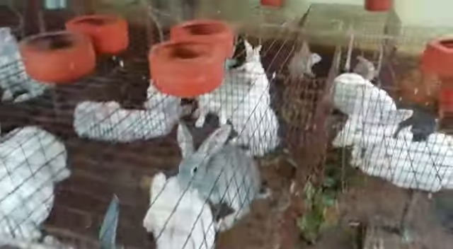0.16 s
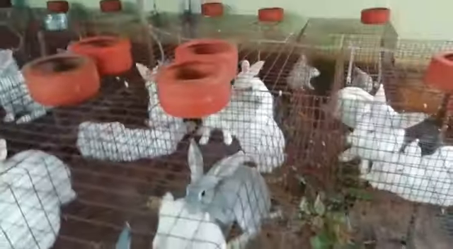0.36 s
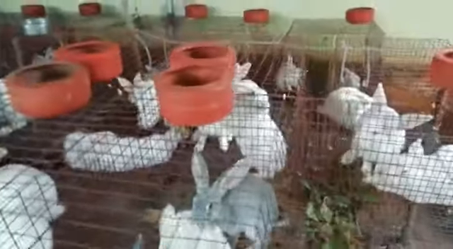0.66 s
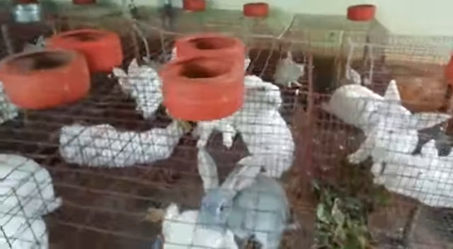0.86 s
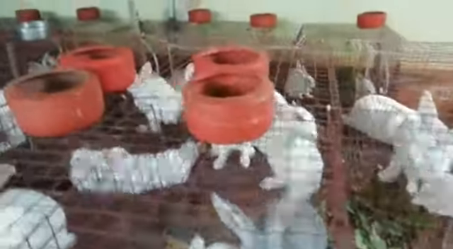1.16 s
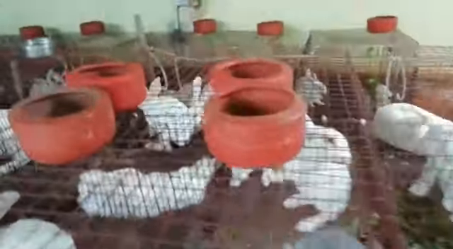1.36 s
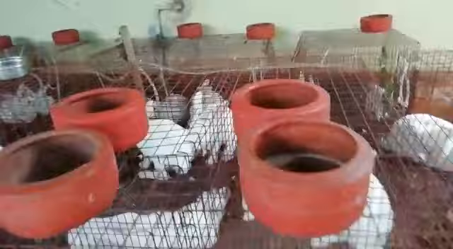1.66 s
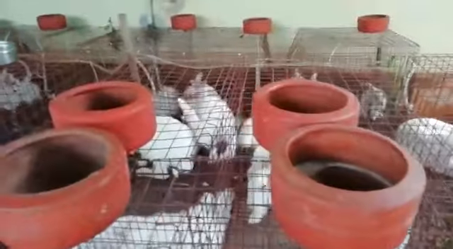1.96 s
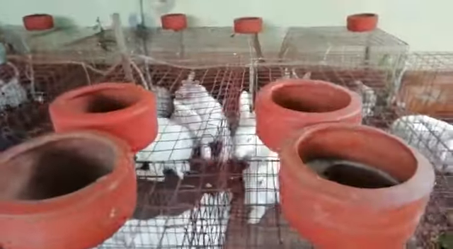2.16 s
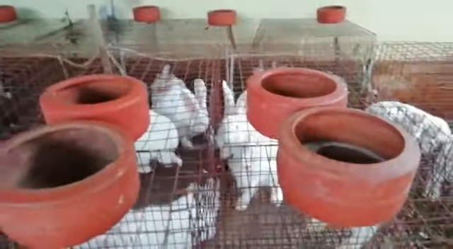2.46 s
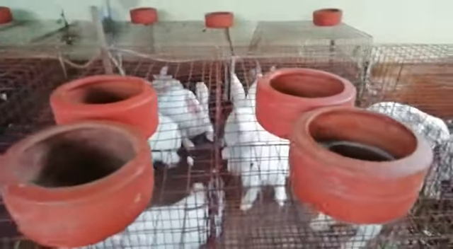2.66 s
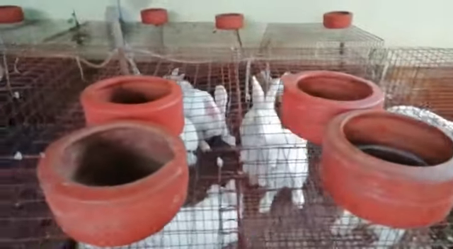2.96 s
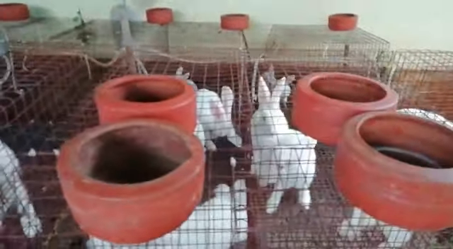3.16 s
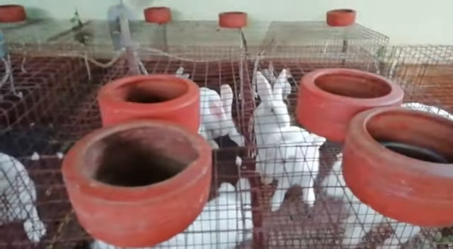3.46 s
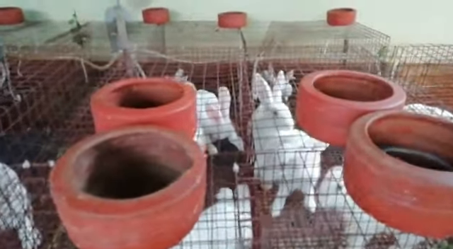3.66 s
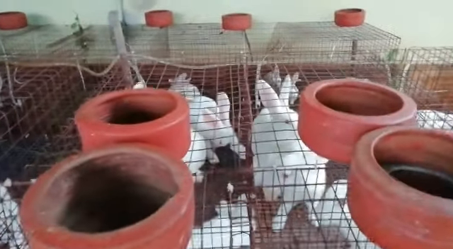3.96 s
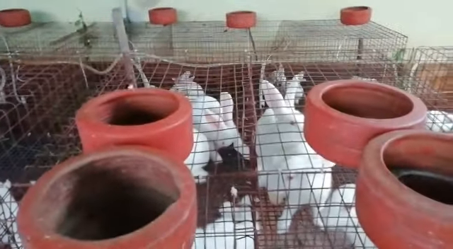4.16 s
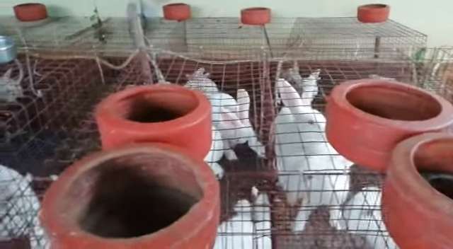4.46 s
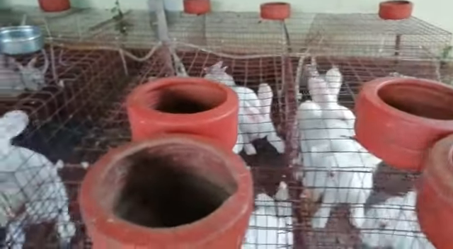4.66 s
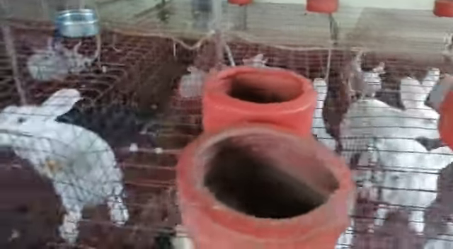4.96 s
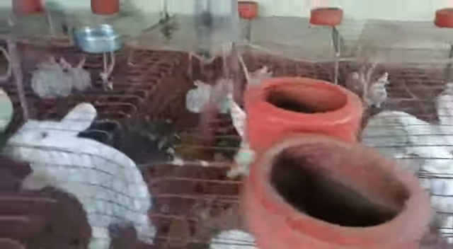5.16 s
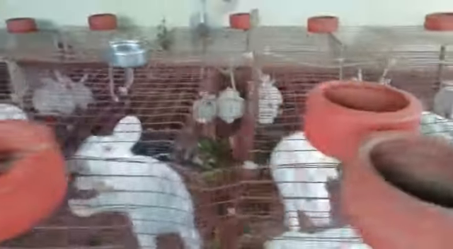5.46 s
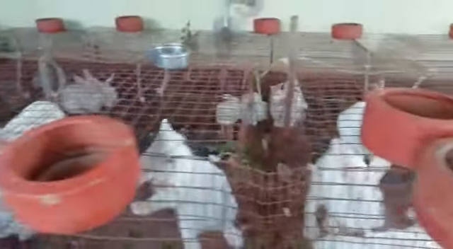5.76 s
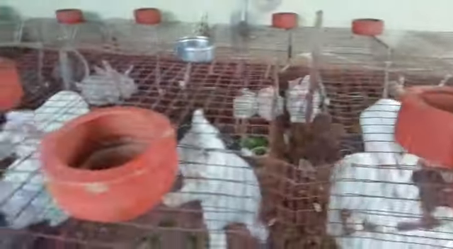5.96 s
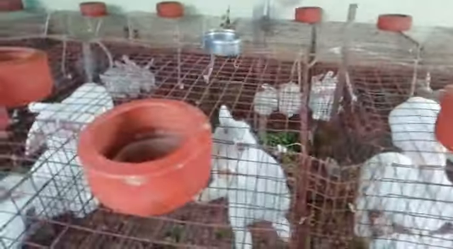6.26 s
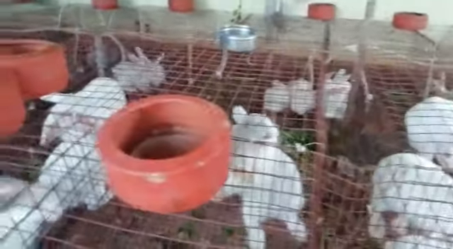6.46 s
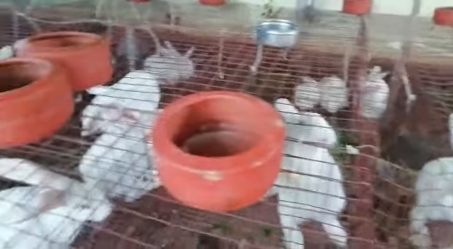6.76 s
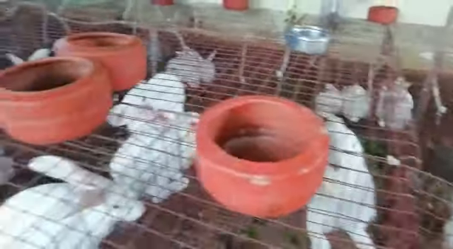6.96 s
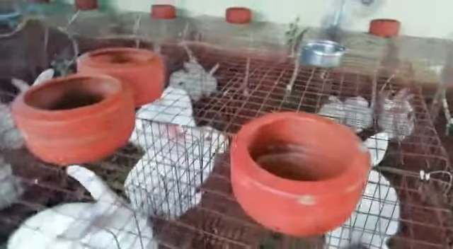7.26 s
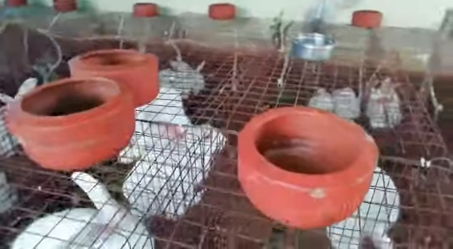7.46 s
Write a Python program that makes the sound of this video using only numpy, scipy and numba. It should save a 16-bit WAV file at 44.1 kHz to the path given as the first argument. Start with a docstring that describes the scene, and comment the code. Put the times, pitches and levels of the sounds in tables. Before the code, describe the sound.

Rabbits move about on wire-mesh cage floors in a shed, heard close on a hand-held phone. A soft, gritty patter runs throughout, broken by irregular hops, scuffles, thin claw ticks and brief wire jangles. During the first second a finger rubs and creaks on the microphone, mostly on the right, with a sharp creak near 0.4 seconds and a scrape near 0.8, then slides off and the sound opens up. Stronger scuffles come around 1.6 to 1.8 seconds, starting with a short clay bowl knock. The bowl is knocked again at about 3.2 and 3.9 seconds, followed by a strong scuffle at 4. Lighter shuffling and ticking continue, with more hops near 6, 6.8, 7.1 and 7.5 seconds. A faint distant motor hum and steady low rumble sit underneath, and the knocks and ticks have only a very short echo.

```python
"""A shed: rabbits shuffle, hop and scratch on wire-mesh cage floors, heard by a two-port hand-held phone.
Paws rustle the mesh, claws tick on wires, a clay bowl is knocked; a far motor hums over low rumble.
For the first second a finger half covers the right port, creaking and rubbing on the case,
then slides off."""
import sys
import numpy as np
from scipy import signal
from scipy.fft import rfft, irfft
from scipy.io import wavfile
from numba import njit

SR = 44100
rng = np.random.default_rng(int(sys.argv[2]) if len(sys.argv) > 2 else 0)


def bounce(signal):
    """Save signal as a 16-bit WAV file at the path given by the first command-line argument."""
    frames = np.transpose(np.atleast_2d(signal))
    limited = np.clip(frames, -1, 1)
    pcm = np.round(limited * 32767).astype(np.int16)
    wavfile.write(sys.argv[1], SR, pcm)


N = 336042
TIME = np.arange(N) / SR

# Clear hops and scuffles: start_s, level_db, t60_s, heft_db, bright_db, pan_db (left minus right)
SCUFFLES = [(.048, -39.5, 0.16, 3, -6, 5), (.372, -53, .22, 3, 10.5, 9), (.414, -53, 0.19, -1, 7, 7),
            (.639, -50.5, 0.17, -2, 3, 19), (.783, -47.5, .21, 9.5, 3, 6), (1.152, -57, 0.21, -10, 17, 2),
            (1.339, -43, 0.69, 1.5, 0.5, 0.5), (1.485, -48, 0.14, -14, 8, 3),
            (1.531, -39.5, 0.22, -12, 2, -2), (1.591, -27, .21, -5.5, -1.5, 4),
            (1.675, -48, .22, -12, 8, -8), (1.741, -36, 0.53, -1, -3, -.5),
            (1.81, -25.5, 0.19, -4.5, -3, 3), (2.079, -43.5, 0.27, 6.5, 4, -1),
            (2.358, -48.5, 0.15, 10, -9, 0), (2.5, -38.5, 0.32, -4, -8, -1.5),
            (2.685, -36, 0.38, 2, 0, 1.5), (2.904, -44.5, 0.19, 2, 1, -4), (2.925, -44.5, 0.19, -17, 6, -9),
            (2.972, -48.5, 0.18, -10, 6, -2), (3.172, -42, .15, 2, -6, -2),
            (3.229, -29.5, 0.31, -7.5, -0.5, 5), (3.396, -54.5, 0.51, -12, 15.5, 0),
            (3.599, -47.5, .4, -6, 5.5, 3), (3.689, -49, 0.64, -5, 2.5, -7),
            (3.855, -28.5, 0.16, -19, -7.5, 5), (4.045, -23.5, 0.28, -3.5, -8.5, -1),
            (4.206, -38, 0.31, 2, -7, -1.5), (4.353, -42.5, .46, -0.5, 2, 0),
            (4.64, -39.5, 0.33, -16, -15, 1), (4.67, -41, .24, -22, -4.5, -4),
            (4.785, -44, 0.55, -1, -2, -3), (5, -39.5, .11, 5.5, -4, 0.5), (5.123, -46.5, .15, 1, 1.5, -4),
            (5.427, -48.5, 0.36, 3.5, -1, -5), (5.522, -45.5, .12, 4, -11, -1),
            (5.609, -38, .2, -3.5, -4.5, -3.5), (5.689, -35.5, 0.26, -8, -15, -2.5),
            (5.716, -46, 0.17, 0, -8, -2), (5.824, -49, 0.29, 4, 6.5, -3), (5.844, -37, .31, -3, -2.5, 2.5),
            (5.954, -31.5, 0.33, 1, -1, -1.5), (6.242, -37.5, 0.41, -7, -8.5, -5),
            (6.435, -44.5, .28, 3, -12, 0), (6.382, -53, 0.43, -8, 4, -3), (6.529, -47, 0.23, -4, 1.5, -8),
            (6.572, -46, 0.71, 5, 1, -2), (6.669, -51.5, 0.13, -14, 10, -9),
            (6.761, -36, 0.52, -0.5, 2, -1), (6.898, -38.5, 0.27, 2.5, -2, -2),
            (7.048, -41.5, 0.31, 2, -2, -1.5), (6.986, -50, 0.14, -1, -6, -9), (7.14, -35, 0.3, -5, -5, -1),
            (7.331, -45.5, .18, -7, 4.5, -9), (7.53, -30.5, .29, -4.5, -19, -3),
            (7.563, -33, 0.23, -20, -12, 0)]
# Resonances of the stiffer wires: pitch_hz, width_hz, gain_db
WIRE_MODES = [(1160, 340, -18.5), (1533, 52, -8.5), (2030, 65, -12), (2520, 130, -10.5), (2790, 690, -14),
              (3635, 25, -3)]


def mesh_rustle():
    """Near paws and the far herd shake the mesh: gritty noise in five bands, through wire resonances."""
    # Animals further off: time_s, patter_db, sizzle_db
    herd = [(0.0, -49.5, 2.5), (0.74, -53, 4.5), (0.89, -48.5, 0), (1.31, -49.5, 2), (1.7, -49.5, 8.5),
            (1.89, -49.5, 3), (4.11, -48, 2), (5.14, -50, 1.5), (6.35, -49.5, 0.5), (6.66, -49.5, 3.5),
            (7.62, -48.5, 1.5)]
    herd_s, patter_db, sizzle_db = np.transpose(herd)
    # lo_hz, hi_hz, rise_factor, gain_db, heft_share, bright_share
    bands = [(57.5, 664, 2.3, 2.6, 1.14, 0),  # thump
             (620, 2950, 1.2, .21, 1.03, 0),  # body
             (1710, 4030, 1.63, -.22, 0, 0),  # rattle
             (4160, 8560, .2, 1.14, 0, .9),  # sizzle
             (8340, 13800, .25, .44, 0, .88)]  # air
    base_rise_s, snap_s = .0042, .0027
    out, t = np.zeros((2, N)), TIME[:SR // 4]
    paws = SCUFFLES + faint_scuffles()
    for lo_hz, hi_hz, rise_factor, gain_db, heft_share, bright_share in bands:
        treble = lo_hz > 4000
        far = undb(np.interp(TIME, herd_s, patter_db + treble * sizzle_db))
        far *= grit(per_s=650, spread_db=3, smear_s=.01)
        far *= grit(per_s=30, spread_db=1.5, smear_s=.056) ** .44  # bouts of scratching
        attack = 1 - np.exp(-(t / (rise_factor * base_rise_s)) ** 2)
        snap = 1 + treble * .69 * np.exp(-t / snap_s)  # wires snap at first touch
        near = np.zeros((2, N))
        for start_s, level_db, t60_s, heft_db, bright_db, pan_db in paws:
            band_db = level_db + gain_db + heft_share * heft_db + bright_share * bright_db
            add(near, start_s, attack * snap * pan(pan_db) * undb(band_db - 60 * t / t60_s))
        near *= grit(per_s=2400, spread_db=2, smear_s=.0034)
        out += band(port_noise(N), lo_hz, hi_hz) * np.hypot(far, near)
    return out + sum(undb(gain_db) * signal.lfilter(*signal.iirpeak(hz, hz / width_hz, SR), out)
                     for hz, width_hz, gain_db in WIRE_MODES)


def faint_scuffles(per_s=2.8, level_db=-59, t60_s=.1, spread_db=6):
    """Light paw falls at random times, as rows like SCUFFLES."""
    count = int(per_s * N / SR)
    starts_s = rng.random(count) * N / SR
    offsets_db = rng.standard_normal((count, 4)) * spread_db
    return [(start_s, level_db + size_db / 2, t60_s, heft_db, bright_db, pan_db)
            for start_s, (size_db, heft_db, bright_db, pan_db) in zip(starts_s, offsets_db)]


def claw_ticks(patter_per_s=160):
    """Claws and teeth tick on single wires, over a faint random patter from all around."""
    # Clear ticks: start_s, level_db, pitch_hz, cycles, pan_db
    ticks = [(1.0743, -33, 5710, 4, 8.5), (1.154, -17.5, 9560, 6.8, -10), (1.4862, -24.5, 6940, 1.9, -14),
             (1.4902, -27, 5770, 1.2, 0), (1.5322, -32, 5560, 5, -4), (1.6765, -29.5, 4100, 6.9, -8),
             (1.681, -27, 6700, 6.3, 0), (1.7423, -30.5, 6520, 3.4, -3), (1.8119, -30, 6500, 6, -3),
             (2.2656, -15.5, 8200, 2.9, -6), (2.3791, -35, 1390, 1.2, 0), (2.6876, -29, 2600, 1.7, -5),
             (2.745, -29.5, 6260, 4.2, 0), (2.7906, -34.5, 1940, 1.8, -4), (2.9749, -34, 6850, 7.5, -2),
             (3.1278, -33.5, 6630, 5, -3), (3.1738, -35, 2030, 1.6, -3), (3.544, -43.5, 825, 4, -4),
             (3.599, -39.5, 810, 5.8, -4), (3.8399, -29.5, 6400, 10, 3), (4.0458, -28, 6160, 7.4, -3),
             (4.052, -27, 2350, 3.1, -3), (4.208, -26, 6540, 3.8, -5), (4.3534, -42.5, 1180, 2.7, -3),
             (4.6399, -32, 2040, 1.4, 0), (5.269, -43.5, 2370, 4.5, -10), (5.371, -44, 2230, 4.7, -9),
             (5.4284, -36, 1990, 1, 0), (5.6882, -30, 4200, 2.6, -10), (5.9539, -24, 7000, 4.6, -9),
             (6.4347, -33, 2220, 1, -6), (6.4955, -35, 1990, 1.4, -4), (6.5735, -29.5, 1920, 2, -1),
             (6.599, -33, 1750, 1.7, 0), (6.62, -36, 1850, 2, -7), (6.7602, -30, 6680, 5.2, -2),
             (6.8186, -27, 6900, 6.2, -1), (7.2638, -32.5, 2280, 2.8, -4), (7.5278, -26.5, 2260, 1.2, -3)]
    out = np.zeros((2, N))
    for start_s, level_db, pitch_hz, cycles, pan_db in ticks:
        add(out, start_s, undb(level_db) * pan(pan_db) * click(pitch_hz, cycles))
    for when, thinness, length, size, place in rng.random((int(patter_per_s * N / SR), 5)):
        level_db = -58 + 9 * (size ** 3 + 1.4 * thinness)  # thin wires tick sharper
        tick = click(pitch_hz=900 * 11 ** thinness, cycles=1.04 + 3 * length ** 2)
        add(out, when * N / SR, undb(level_db) * pan(16 * (place - .5)) * tick)
    return out


def bowl_knocks(spread_db=3, detune=.012):
    """A clay bowl is bumped and rebounds; each blow lands elsewhere, so its modes vary."""
    # Blows: start_s, level_db
    knocks = [(1.594, -19.5), (1.6051, -23), (2.688, -34.5), (3.23, -36), (3.2389, -25), (3.8563, -20.5),
              (3.8626, -19.5), (3.8656, -40), (3.9032, -40)]
    # Bowl modes: pitch_hz, gain_db, t60_s
    modes = [(1216, -12.5, 0.036), (1250, -14.5, 0.04), (1404, -10.5, 0.039), (1422, -7.5, 0.043),
             (1478, -21, 0.12)]
    out = np.zeros(N)
    for start_s, level_db in knocks:
        for pitch_hz, gain_db, t60_s in modes:
            size, offset = rng.standard_normal(2)
            tone = ring(pitch_hz * (1 + detune * offset), t60_s)
            add(out, start_s, undb(level_db + gain_db + spread_db * size) * tone)
    return out


def wire_rings(t60_s=.071, jangle_s=.07, detune=.117):
    """Single wires ring on after a paw; each clear scuffle also jangles a few, off pitch."""
    # Ringing wires: start_s, level_db, pitch_hz
    rings = [(1.622, -43, 2610), (1.638, -42, 2500), (2.721, -49, 2670), (2.86, -51, 2500),
             (3.02, -50, 2750), (3.245, -44, 2750), (3.09, -49, 1510), (3.886, -44, 2776),
             (4.06, -37, 2710), (4.216, -42, 2410), (5.267, -49, 2640), (5.855, -41.5, 3095),
             (5.97, -42, 1074), (6.317, -44, 2600), (6.781, -50, 2570), (6.915, -45, 2620),
             (7.06, -47, 842)]
    out = np.zeros((2, N))
    for start_s, level_db, pitch_hz in rings:
        add(out, start_s, undb(level_db) * ring(pitch_hz, t60_s))
    for start_s, scuffle_db, *_, pan_db in SCUFFLES:
        for pitch_hz, _, _ in WIRE_MODES:
            late, offset, weakness = rng.random(3)
            level_db = scuffle_db - 18 - 12 * late - 14 * weakness
            tone = ring(pitch_hz * (1 + detune * (2 * offset - 1)), t60_s)
            add(out, min(start_s + jangle_s * late, TIME[-1]), undb(level_db) * pan(pan_db) * tone)
    return out


def finger(port_hz):
    """Skin rubs and creaks at the right port; it reaches the left later and duller, round the case."""
    # Creaks on the case: start_s, level_db, pitch_hz, cycles
    creaks = [(0.049, -24.5, 1490, 0.72), (0.339, -24.5, 480, 1.85), (0.384, -32, 403, 1.8),
              (.425, -34, 1500, 1.7), (0.436, -31, 300, 0.94), (0.441, -3.5, 2620, 1.54),
              (0.442, -12.5, 2000, 1.5), (0.448, -10.5, 1730, 1.34), (.4516, -31, 204, .9),
              (.452, -8, 1290, 0.55), (0.4546, -21, 1820, 1.8), (0.745, -25.5, 1390, 4.87),
              (.8185, -22, 1800, 3.4), (.8197, -12.5, 3650, 1.9), (.8203, -33, 8000, 0.83),
              (.891, -24, 1500, 2.1), (0.962, -19.5, 1190, 0.45)]
    slide = undb(stroke_level_db()) * grit(per_s=14000, spread_db=6, smear_s=.0025)
    skin = unit_rms(band(rng.standard_normal(N), 290, 6000))
    rub = cavity(cavity(skin, port_hz, damping=.63), .94 * port_hz, damping=2.2)
    hiss = band(band(rng.standard_normal(N), 4900, 14000), 3000, 15000)
    whistle = cavity(hiss, port_hz, damping=.24)
    openness = (port_hz / port_hz.max()) ** 5
    right = slide * (rub + openness * (undb(-4.5) * hiss + undb(-10) * whistle))
    for start_s, level_db, pitch_hz, cycles in creaks:
        add(right, max(start_s - .001, 0), undb(level_db) * click(pitch_hz, cycles))
    left = signal.sosfilt(signal.butter(1, 330, fs=SR, output="sos"), np.roll(right, 24))
    return np.array([left, right])


def stroke_level_db(rest_db=-60, lift_s=1):
    """Finger strokes rise, hold, let go and drag; the resting finger whispers until it lifts."""
    # Strokes on the case: peak_s, level_db, rise_s, hold_s
    strokes = [(0., -32.5, .01, .001), (0.343, -39, .01, .001), (0.442, -31, .012, .001),
               (0.756, -37, 0.04, .002), (0.842, -22, .032, 0.017), (.96, -36, .01, .01),
               (.984, -24.5, 0.015, .02)]
    rise_db, release_db_per_s = 15.5, 597
    drag_db, drag_db_per_s = -7.5, 200
    out = np.where(TIME < lift_s, rest_db, -150.)
    for peak_s, level_db, rise_s, hold_s in strokes:
        before_s = np.maximum(peak_s - TIME, 0)
        after_s = np.maximum(TIME - peak_s - hold_s, 0)
        fall_db = np.maximum(-release_db_per_s * after_s, drag_db - drag_db_per_s * after_s)
        out = np.maximum(out, level_db + fall_db - rise_db * before_s / rise_s)
    return out


def port_pitch_hz(covered_hz=3070, open_hz=7230, open_s=1, slide_s=.0182):
    """The right port's resonance rises briefly as the finger shifts, then jumps as it slides off."""
    shift_hz, shift_s, shift_width_s = 500, .85, .031
    shift = np.exp(-((TIME - shift_s) / shift_width_s) ** 2)
    opened = (1 + np.tanh((TIME - open_s) / slide_s)) / 2
    return covered_hz + shift_hz * shift + (open_hz - covered_hz) * opened


def shed_echo(x, t60_s=.16, level_db=-5.5, gap_s=.004):
    """The shed's reflections: a short tail of decaying noise."""
    t = TIME[:SR // 2]
    tail = port_noise(len(t)) * undb(-60 * t / t60_s) * (t > gap_s)
    tail *= undb(level_db) / np.sqrt(np.sum(tail ** 2) / 2)
    return signal.fftconvolve(x, tail, axes=1)[:, :N]


def motor_hum():
    """A far motor: one low tone drifting in pitch and level."""
    # Hum: time_s, pitch_hz, rms_db
    drift = [(0.0, 70.3, -51), (1.31, 70.3, -51), (1.95, 77.2, -71), (4.54, 76.8, -64.5),
             (4.75, 62.85, -57.5), (7.62, 68.5, -64)]
    time_s, pitch_hz, rms_db = np.transpose(drift)
    phase = 2 * np.pi * np.cumsum(np.interp(TIME, time_s, pitch_hz)) / SR
    return np.sqrt(2) * undb(np.interp(TIME, time_s, rms_db)) * np.sin(phase)


def rumble(rms_db=-58.5):
    """Steady low noise, alike at both ports."""
    # Spectral shape: freq_hz, relative_db
    spectrum = [(8.8, -41), (15, -1.5), (38, 5.5), (70, -1.5), (87, 3.5), (119, -2), (141, -2),
                (237, -10.5), (400, -11.5), (520, -42.5), (880, -120)]
    return undb(rms_db) * unit_rms(colour(rng.standard_normal(N), spectrum))


def ring(pitch_hz, t60_s, attack_s=.00095):
    """One struck mode; fur cushions the blow."""
    t = TIME[:SR // 4]
    return (1 - np.exp(-t / attack_s)) * undb(-60 * t / t60_s) * np.sin(2 * np.pi * pitch_hz * t)


def click(pitch_hz, cycles):
    """A few cycles under a bell envelope that peaks at least 1 ms in."""
    width_s = cycles / pitch_hz / 4
    t = TIME[:int(.03 * SR)] - max(.001, 2.5 * width_s)
    return np.sin(2 * np.pi * pitch_hz * t + 2.33) * np.exp(-(t / width_s) ** 2 / 2)


def grit(per_s, spread_db, smear_s):
    """Envelope of many tiny contacts: random slips of uneven size, each with a short tail."""
    slips = rng.random(N) < per_s / SR
    energy = undb(2 * spread_db * np.minimum(rng.exponential(size=N), 5.5))
    power = signal.lfilter([1], [1, -np.exp(-1 / (smear_s * SR))], slips * energy)
    return unit_rms(np.sqrt(power + 1e-12))


@njit
def cavity(x, pitch_hz, damping):
    """Air cavity: a resonant low-pass with moving pitch."""
    y, band_state, low_state = np.empty(len(x)), 0., 0.
    for i in range(len(x)):
        g = np.tan(np.pi * pitch_hz[i] / SR)
        flow = (band_state + g * (x[i] - low_state)) / (1 + g * (g + damping))
        y[i] = low_state + g * flow
        band_state, low_state = 2 * flow - band_state, 2 * y[i] - low_state
    return y


def port_noise(size, crossover_hz=450):
    """Noise at two ports: alike in the bass, unrelated in the treble."""
    noise = rng.standard_normal((3, size))
    low, high = [signal.butter(1, crossover_hz, kind, fs=SR, output="sos") for kind in ("low", "high")]
    return signal.sosfilt(low, noise[0]) + signal.sosfilt(high, noise[1:])


def colour(x, points):
    """Causal filter through (freq_hz, gain_db) points, by folded cepstrum."""
    size = 2 ** 13
    freq_hz, gain_db = np.transpose(points)
    bins_hz = np.arange(size // 2 + 1) * SR / size
    curve_db = np.interp(np.log(bins_hz + 1), np.log(freq_hz), gain_db)
    cepstrum = irfft(curve_db * np.log(10) / 20)
    cepstrum[1:size // 2] *= 2
    cepstrum[size // 2 + 1:] = 0
    return signal.fftconvolve(x, irfft(np.exp(rfft(cepstrum))))[:N]


def band(x, lo_hz, hi_hz):
    """Gentle band-pass."""
    return signal.sosfilt(signal.butter(2, [lo_hz, hi_hz], "band", fs=SR, output="sos"), x)


def add(out, start_s, sound):
    """Mix a sound in at start_s."""
    i = int(start_s * SR)
    out[..., i:i + sound.shape[-1]] += sound[..., :N - i]


def pan(pan_db):
    """Left and right gains, pan_db apart."""
    return undb(np.array([[pan_db], [-pan_db]]) / 2)


def undb(db):
    """Decibels to gain."""
    return 10 ** (np.asarray(db) / 20)


def unit_rms(x):
    """Scale to rms 1."""
    return x / np.sqrt(np.mean(x ** 2))


def scene():
    """Cage sounds through each port's colour, plus finger, hum, rumble and microphone hiss."""
    # Left microphone with the shed's tilt: freq_hz, gain_db
    left_response = [(100, 0), (350, -2), (700, 0.5), (1200, 5), (2500, -6), (3100, -4.5), (3800, -7),
                     (6000, -12.5), (7000, -14.5), (7600, -49), (9500, -13), (13500, -12.5), (14700, -1.5),
                     (15600, 0), (16100, -93)]
    # Right microphone with the shed's tilt: freq_hz, gain_db
    right_response = [(100, -4.5), (350, -4.5), (700, 0.5), (1300, 4.5), (1900, 1), (2550, 2.5),
                      (3200, -0.5), (4500, -8), (6300, -2), (7100, -2.5), (7700, -12.5), (9500, -13),
                      (13000, -1.5), (14700, 9), (15600, -9), (16100, -61)]
    port_hz = port_pitch_hz()
    rustle = mesh_rustle()
    blows = bowl_knocks() + wire_rings() + claw_ticks()
    left, right = rustle + blows + shed_echo(blows)
    right = cavity(right, port_hz, damping=.62)
    cages = np.array([colour(left, left_response), colour(right, right_response)])
    hiss = undb(-70.5) * band(rng.standard_normal((2, N)), 3000, 16400)
    return cages + finger(port_hz) + motor_hum() + rumble() + hiss


def record(dry):
    """The phone cuts the top treble."""
    cutoff_hz = 16350
    return signal.sosfilt(signal.ellip(10, .2, 80, cutoff_hz, fs=SR, output="sos"), dry)


dry = scene()
out = record(dry)
bounce(out)
```